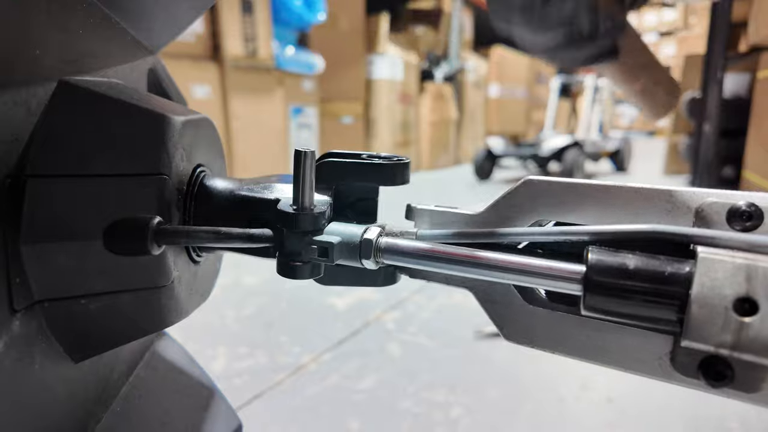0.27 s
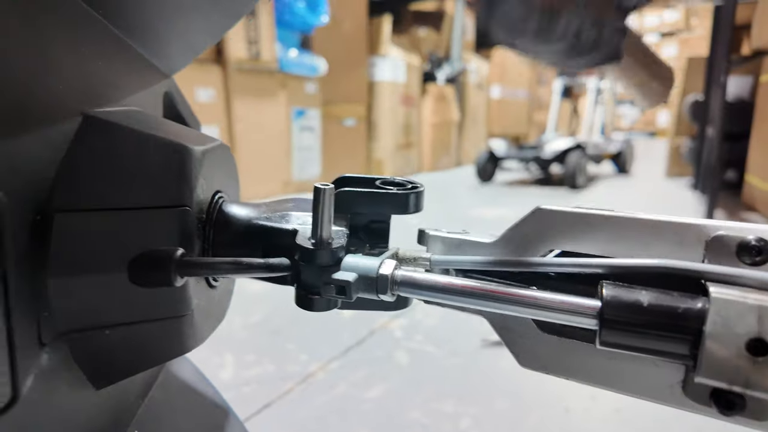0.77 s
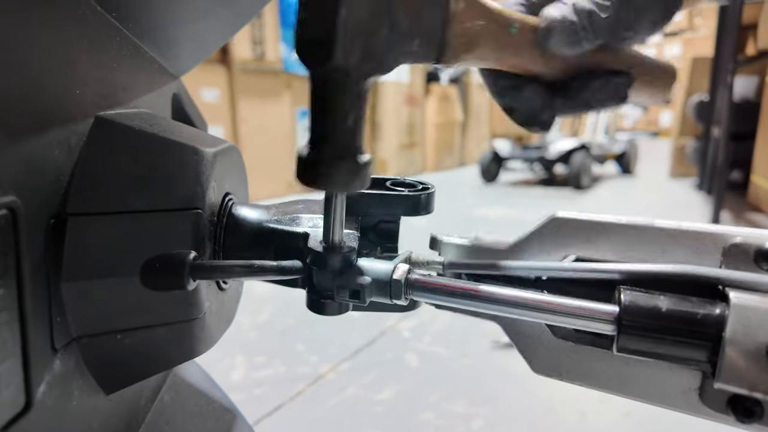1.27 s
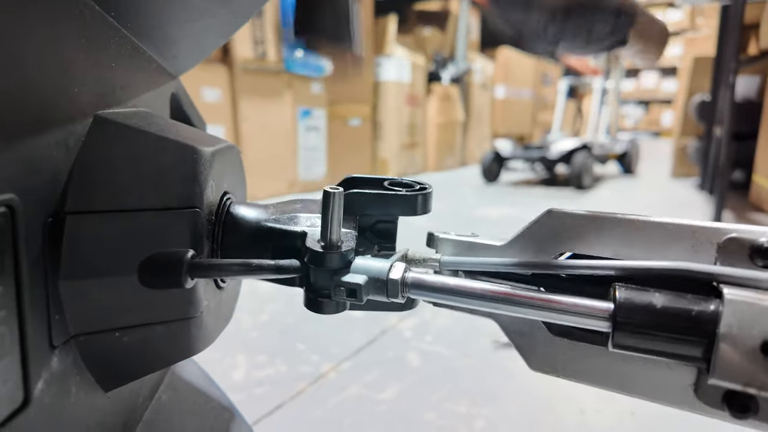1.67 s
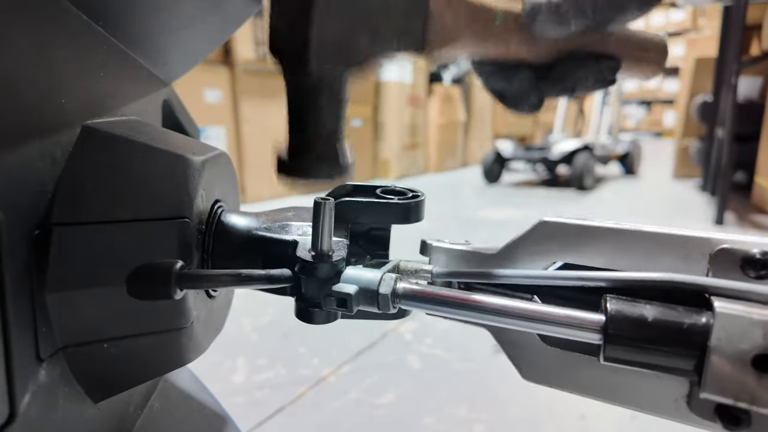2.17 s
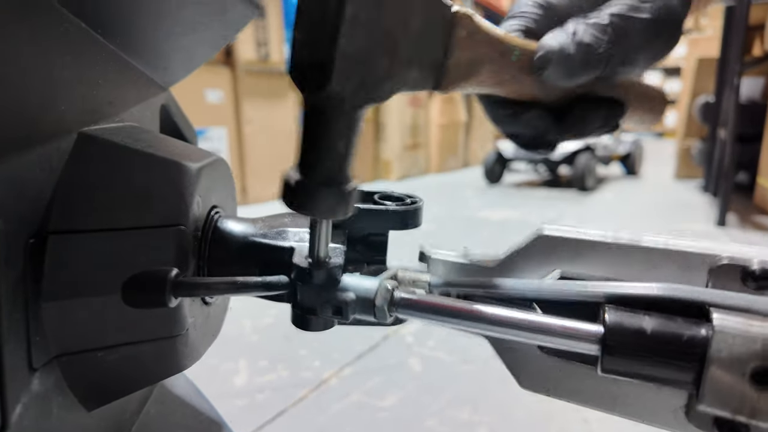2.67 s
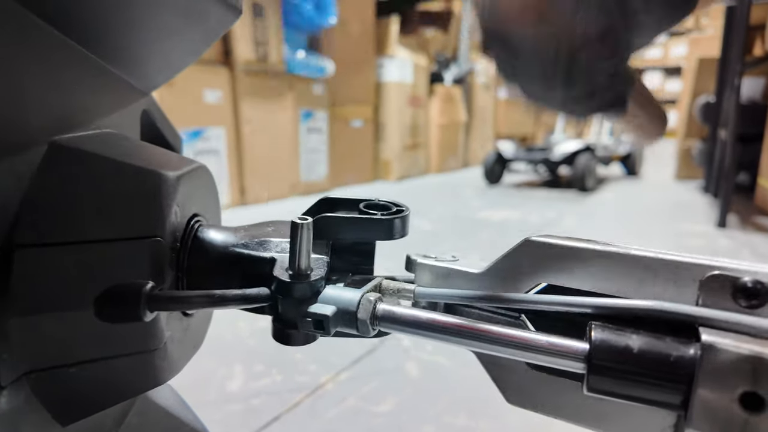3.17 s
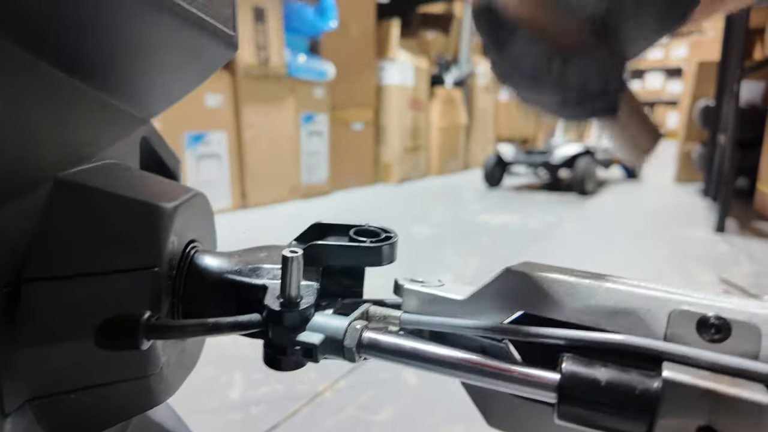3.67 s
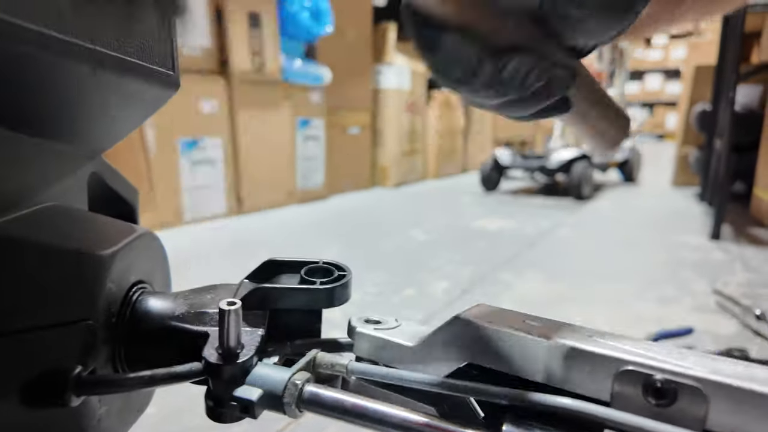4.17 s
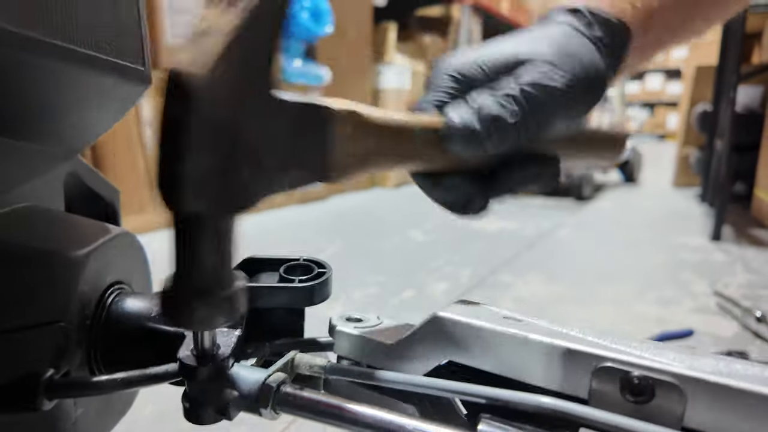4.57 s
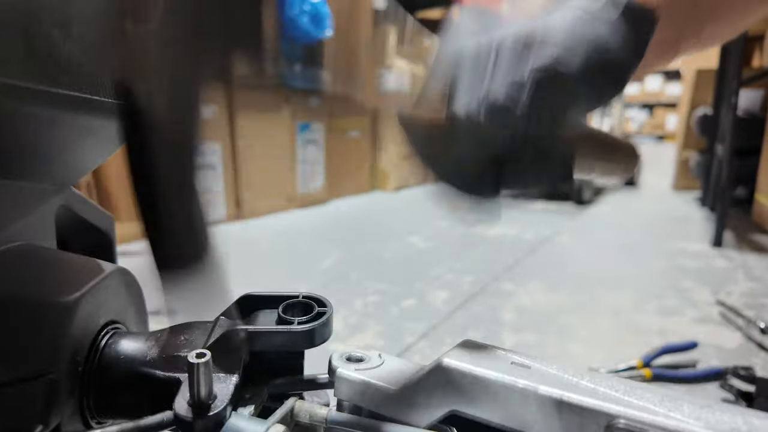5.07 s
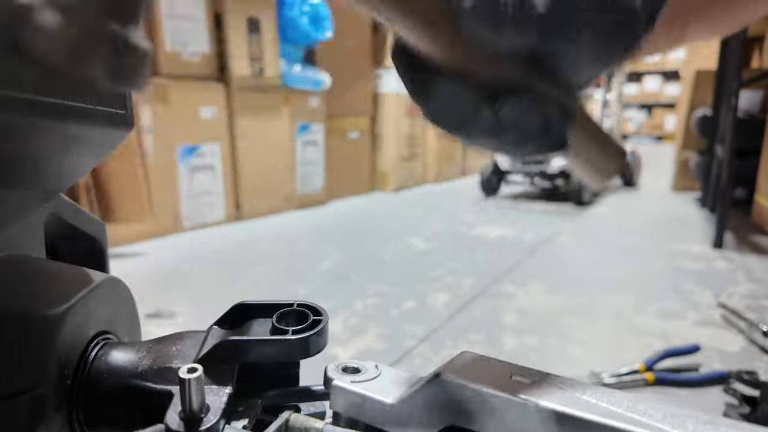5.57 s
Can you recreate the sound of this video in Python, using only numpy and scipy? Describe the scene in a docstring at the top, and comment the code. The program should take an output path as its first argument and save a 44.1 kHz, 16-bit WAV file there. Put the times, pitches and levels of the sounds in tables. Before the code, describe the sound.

Close, steady hammering on a metal pin, each blow cracking and ringing faintly while the metal frame clacks more as it loosens.

```python
"""Hammering a steel pin

A claw hammer drives a steel pin into the frame of a small vehicle: twenty even blows, close by.
Each blow cracks, knocks the frame and sets the hammer's claws ringing. As the joint works loose,
the knock weakens and the frame clacks back sooner and louder. A storeroom full of cartons
answers briefly, and the blows overload the microphone."""
import sys
import numpy as np
from scipy import signal
from scipy.fft import rfft, irfft, next_fast_len
from scipy.io import wavfile

SR = 44100
rng = np.random.default_rng(int(sys.argv[2]) if len(sys.argv) > 2 else 0)


def waveform_to_disk(signal):
    """Save audio, clipped to [-1, 1], as 16-bit WAV at the path in sys.argv[1]."""
    frames = np.transpose(np.atleast_2d(signal))
    scaled = np.clip(frames, -1, 1) * 32767
    samples = np.round(scaled).astype(np.int16)
    wavfile.write(sys.argv[1], SR, samples)


N = 257103
T = np.arange(SR) / SR  # the one second that a blow lasts

# Levels are relative. A fade_s is the time a sound takes to drop by 60 dB.
# the tone of the room's quiet air: pitch_hz, level_db
AIR_TONE = [(25, -5), (60, 2.5), (160, -0.5), (270, -10), (380, -3.5), (600, -12.5), (840, -7.5),
            (1200, -17.5), (3000, -23.5), (7000, -30), (16000, -47)]
# faint ticks as the hammer is first raised: start_s, level_db
TICKS = [(0.054, -57), (0.127, -58)]
# the tone of a tick: pitch_hz, level_db
TICK_TONE = [(300, -10), (1000, 6), (2000, -8), (3100, -4), (4500, -19), (12000, -29)]
# soft shifts of the frame: start_s, level_db, pitch_hz
SHIFTS = [(0.122, -50, 780), (4.449, -35.5, 357), (4.469, -38.5, 754)]
# hammer blows: start_s, force_db, claw_ring_db
BLOWS = [(0.3938, -7, -46), (0.6758, -1.5, -49), (0.9683, -0.5, -38.5), (1.2903, -2.5, -45),
         (1.5779, -1, -44), (1.8565, -0.5, -45.5), (2.1414, -0.5, -56.5), (2.418, -0.5, -44),
         (2.6957, 1, -49), (2.9726, 0.5, -53.5), (3.2405, 1, -46.5), (3.501, 0.5, -43.5),
         (3.7694, -1, -38.5), (4.0331, -1, -43.5), (4.3079, 0, -42.5), (4.5796, 1, -50.5),
         (4.8582, -1, -46.5), (5.134, -0.5, -41.5), (5.403, 0, -45.5), (5.676, -0.5, -47.5)]
# the notes at which frame, pin and bracket ring: pitch_hz, level_db, fade_s
FRAME_NOTES = [(190, -20, .13), (230, -25.5, 0.14), (334, -26.5, 0.12), (484.7, -17, 0.05),
               (579.5, -21.5, 0.047), (689.3, -8, 0.049), (823, -16, 0.078), (876.2, -4.5, 0.049),
               (997.3, -12.5, .055), (1148, -15, 0.068), (1237, -14, 0.044), (1547, -19, 0.079),
               (1826, -5.5, 0.023), (2740, -15.5, 0.061), (3597, -18, 0.048), (3810, -37.5, 0.24),
               (5010, -13.5, 0.041), (7436, -15, 0.026), (8850, -21, 0.058), (10550, -20, 0.07),
               (11100, -27, 0.05)]
# the crack of the steel's many crowded notes: pitch_hz, level_db
CRACK_TONE = [(40, -34), (150, -14), (400, -1), (900, -2.5), (1500, 0), (2100, -6), (2900, 0), (4200, -5.5),
              (7200, -2.5), (9000, -6.5), (10000, -12), (16000, -12)]
# the sizzle of the hammer's face on the pin: pitch_hz, level_db
SIZZLE_TONE = [(7000, -34), (10000, -25.5), (13200, -7.5), (14600, -1.5), (15600, 17), (16500, -14.5)]
# how tightly the hole grips the pin: time_s, grip_db
PIN_GRIP = [(0.4, -16), (1.0, -3.5), (1.6, -8.5), (4.85, -23), (5.13, -0.5), (5.68, 0)]
# the tone of a tightly held pin: pitch_hz, level_db
PIN_TONE = [(300, -33.5), (1050, -13.5), (1330, -3.5), (1600, 2.5), (1850, -12), (2250, -9), (2460, 10.5),
            (2700, 0), (5800, -6), (9000, -29.5)]
# the tone of the loose joint: pitch_hz, level_db
CLACK_TONE = [(60, -27.5), (180, -2), (400, -5), (750, 3), (1050, 3), (1400, -0.5), (1900, -5.5),
              (3000, -8.5), (7000, -12), (12000, -26), (16000, -28.5)]
# the hammer's two claws: pitch_hz, fade_s
CLAW_NOTES = [(6004, 0.61), (6415, 0.64)]
# the room's bright echo: pitch_hz, level_db
WASH_TONE = [(100, -17), (500, -6.5), (900, -3), (1500, -3), (4000, 1), (7800, 0), (9000, 3.5), (12000, 3),
             (16000, -2)]
# the room's low boom: pitch_hz, level_db
BOOM_TONE = [(40, -21), (110, 2.5), (170, -2.5), (300, -11.5), (900, -35), (3000, -44.5)]
# the frame's bounce as the joint works loose: time_s, bounce_db, delay_s
BOUNCES = [(0.4, -33, 0.042), (0.7, -20.5, .042), (2.14, -23.5, 0.033), (2.42, -15, 0.031),
           (5.1, -11.5, .032), (5.4, -9.5, .026)]

CONTACT_S = .0002  # time for the steel faces to meet
KNOCK_DB, KNOCK_FALL_DB_PER_S = 6.5, 1.71  # the frame takes less of each blow as the pin sinks
SIZZLE_DB, SIZZLE_RISE_DB_PER_S, SIZZLE_PER_GRIP = -9, 2, 0.49  # a firmer pin sounds brighter
TURN_S, TURN_WIDTH_S, TURN_DB = .11, 0.045, 6  # the rising hammer turns its claws past the microphone
RECEDE_DB_PER_S = 13  # the ring dims as the hammer draws away


def amp(db):
    """Turn decibels into a number to multiply by."""
    return 10 ** (np.asarray(db) / 20)


def fade(fade_s):
    """A level that dies away by 60 dB in fade_s."""
    return np.exp(-np.log(1000) * T / fade_s)


def values_at(table, time_s):
    """Read a table at any time, sliding between its rows."""
    times, *columns = np.transpose(table)
    return [np.interp(time_s, times, column) for column in columns]


def filtered(sound, gain_at):
    """Turn each pitch in a sound up or down by gain_at(hz)."""
    size = next_fast_len(len(sound) + 8192)
    return irfft(rfft(sound, size) * gain_at(np.fft.rfftfreq(size, 1 / SR)), size)[:len(sound)]


def noise(tone, size):
    """Noise of strength 1, shaped by a tone table."""
    pitch_hz, level_db = np.transpose(tone)
    hiss = rng.standard_normal(size)
    hiss = filtered(hiss, lambda hz: amp(np.interp(np.log(hz + 1), np.log(pitch_hz + 1), level_db)))
    return hiss / np.std(hiss)


def burst(tone, fade_s, rise_s=CONTACT_S):
    """A puff of noise: many short notes, too crowded to tell apart."""
    return noise(tone, len(T)) * (1 - np.exp(-T / rise_s)) * fade(fade_s)


def add(track, start_s, sound):
    """Mix a sound into the track at start_s."""
    start = max(round(start_s * SR), 0)
    track[start:start + len(sound)] += sound[:max(len(track) - start, 0)]


def room_air(level_db=-57.5):
    """The storeroom's air makes a faint, steady rumble."""
    return amp(level_db) * noise(AIR_TONE, N)


def handling_ticks():
    """The hammer ticks in the hand before the first blow."""
    track = np.zeros(N)
    for start_s, level_db in TICKS:
        add(track, start_s, amp(level_db) * burst(TICK_TONE, fade_s=0.051))
    return track


def frame_shifts(width=0.097, rise_s=0.0031, fade_s=0.19):
    """The frame settles with soft, hollow knocks: noise narrowed around one pitch."""
    track = np.zeros(N)
    for start_s, level_db, hz in SHIFTS:
        hiss = rng.standard_normal(len(T))
        hollow = filtered(hiss, lambda f: 1j * f * width * hz / (hz * hz - f * f + 1j * f * width * hz))
        shape = (1 - np.exp(-T / rise_s)) * fade(fade_s)
        add(track, start_s, amp(level_db - 5) * hollow / np.std(hollow) * shape)
    return track


def frame_ring(scatter_db, detune):
    """The frame rings; every hit shares its force among the notes a little differently."""
    hz, level_db, fade_s = np.transpose(FRAME_NOTES)[:, :, None]
    level_luck, pitch_luck = rng.standard_normal((2, len(FRAME_NOTES), 1))
    sign = (-1) ** np.arange(len(FRAME_NOTES))[:, None]  # neighbouring notes swing against each other
    notes = np.sin(2 * np.pi * hz * (1 + detune * pitch_luck) * T)
    return np.sum(sign * amp(level_db + scatter_db * level_luck) * fade(fade_s) * notes, axis=0)


def strike(start_s, force_db, heave_hz=965):
    """A blow lands: the frame knocks, the faces crack and sizzle, the pin rings, and a short buzz lingers after
    it."""
    grip_db, = values_at(PIN_GRIP, start_s)
    knock = amp(KNOCK_DB - KNOCK_FALL_DB_PER_S * start_s) * frame_ring(scatter_db=1.5, detune=0.0064)
    heave = amp(6) * fade(0.0082) * np.sin(2 * np.pi * heave_hz * T)  # the bracket gives under the pin
    crack = amp(2.5) * burst(CRACK_TONE, fade_s=0.036)
    sizzle_db = SIZZLE_DB + SIZZLE_RISE_DB_PER_S * start_s + SIZZLE_PER_GRIP * grip_db
    sizzle = amp(sizzle_db) * burst(SIZZLE_TONE, fade_s=0.026, rise_s=0.0007)
    pin = amp(grip_db) * burst(PIN_TONE, fade_s=0.042)
    buzz = amp(-13.5) * burst(CLACK_TONE, fade_s=0.16, rise_s=0.0027)
    return amp(force_db) * (knock + heave + crack + sizzle + pin + buzz)


def claw_ring(ring_db, scatter_db=1.5, bend_hz=10., speed_up_s=.05):
    """The claws ring on. Lifting them bends the pitch of their echoes, so the ring wavers."""
    ring = np.zeros(len(T))
    levels_db = ring_db + scatter_db * rng.standard_normal(len(CLAW_NOTES))
    lift = T - speed_up_s * (1 - np.exp(-T / speed_up_s))  # the hammer gathers speed
    for (hz, fade_s), level_db in zip(CLAW_NOTES, levels_db):
        phase = 2 * np.pi * hz * T
        speed = rng.uniform(.5, 2, (2, 1))
        frame_lag, floor_lag = 2 * np.pi * (rng.random((2, 1)) + bend_hz * speed * lift)
        echoes = np.sin(phase - frame_lag) + np.sin(phase - floor_lag)
        ring += amp(level_db) * fade(fade_s) * (np.sin(phase) + .5 * echoes)
    return ring


def room_echo(sound, wash_db=-17.0, boom_db=-36.0, rise_s=0.00098):
    """Shelves and cartons scatter the sound; a low boom outlasts the bright wash."""
    wash = burst(WASH_TONE, fade_s=0.29, rise_s=rise_s)
    boom = burst(BOOM_TONE, fade_s=0.67, rise_s=rise_s)
    tail = amp(wash_db) * wash / np.linalg.norm(wash) + amp(boom_db) * boom / np.linalg.norm(boom)
    return signal.fftconvolve(sound, tail)[:len(sound)]


def frame_bounce(clacks=3, mean_gap_s=.004, loss_db=4.5):
    """The frame snaps back and rattles against its joint, each clack weaker than the last."""
    sound = amp(-9) * frame_ring(scatter_db=4.5, detune=0.011)
    sound += amp(-8) * burst(CRACK_TONE, fade_s=.012)
    gaps_s = rng.gamma(3, mean_gap_s / 3, clacks)
    for k, start_s in enumerate(np.cumsum(gaps_s) - gaps_s[0]):
        add(sound, start_s, amp(2 - loss_db * k) * burst(CLACK_TONE, fade_s=0.033))
    return sound


def hammering(claw_db=8.5):
    """Each blow with its bounce, the ring of the rising hammer and the room's echo."""
    track = np.zeros(N)
    turning = amp(TURN_DB * np.exp(-((T - TURN_S) / TURN_WIDTH_S) ** 2) - RECEDE_DB_PER_S * T)
    for start_s, force_db, ring_db in BLOWS:
        bounce_db, delay_s = values_at(BOUNCES, start_s)
        blow = strike(start_s, force_db)
        add(blow, delay_s, amp(force_db + bounce_db) * frame_bounce())
        blow += amp(claw_db) * turning * claw_ring(ring_db)
        sideways = amp(force_db) * burst(CRACK_TONE, fade_s=.039)  # heard only by way of the shelves
        echo = room_echo(amp(-4) * blow) + room_echo(sideways)
        add(track, start_s, blow + echo)
    return track


def scene():
    """The hammering and its small side noises over the quiet air of the storeroom."""
    return (hammering() + frame_shifts() + handling_ticks() + room_air())[None]


def record(dry, ceiling=0.79, hardness=6.6, low_cut_hz=150.0, top_hz=15700):
    """The microphone flattens the loudest peaks, thins the deep bass and loses the highest treble."""
    sound = dry[0] / (1 + np.abs(dry[0] / ceiling) ** hardness) ** (1 / hardness)
    sound = filtered(sound, lambda hz: 1j * hz / (low_cut_hz + 1j * hz))
    return filtered(sound, lambda hz: 1 / (1 + (hz / top_hz) ** 100))[None]


dry = scene()
out = record(dry)
waveform_to_disk(out)
```